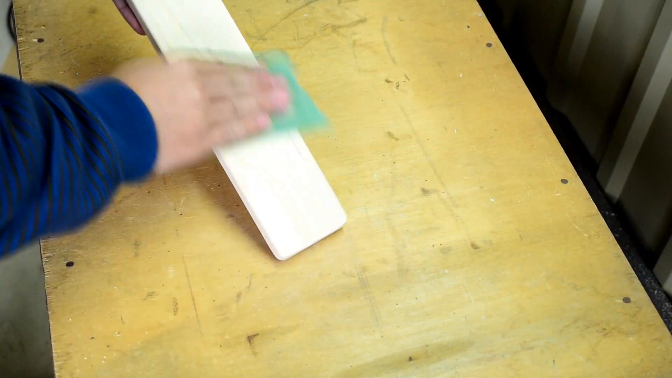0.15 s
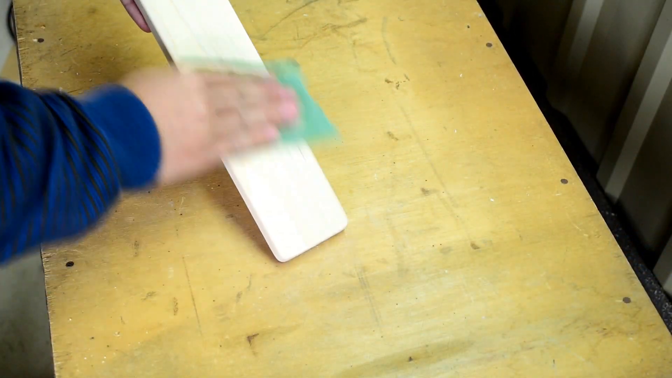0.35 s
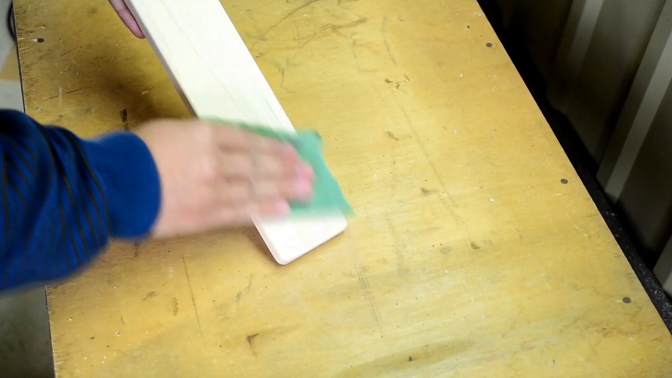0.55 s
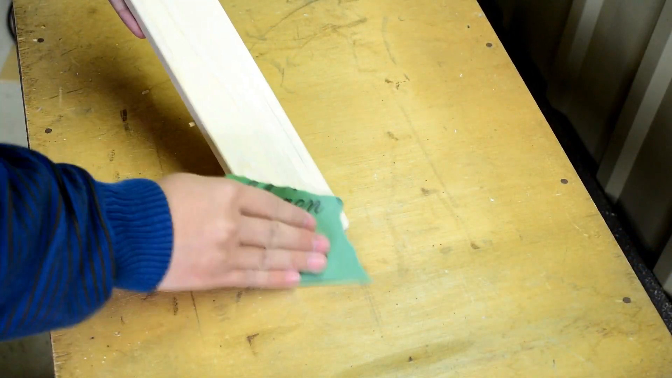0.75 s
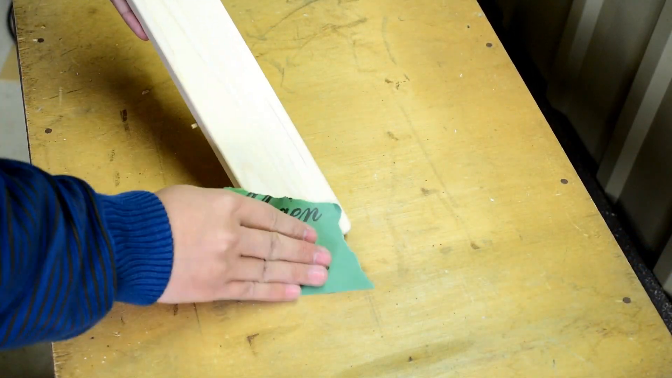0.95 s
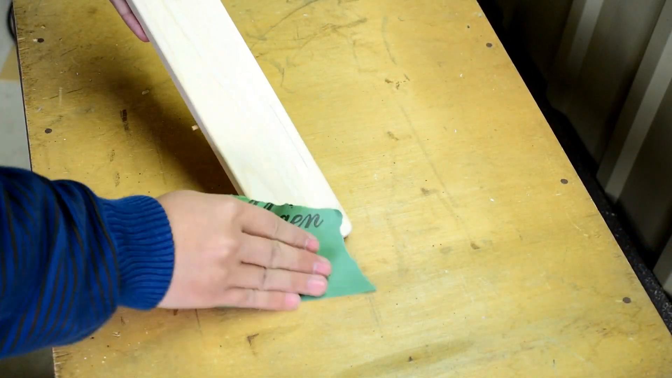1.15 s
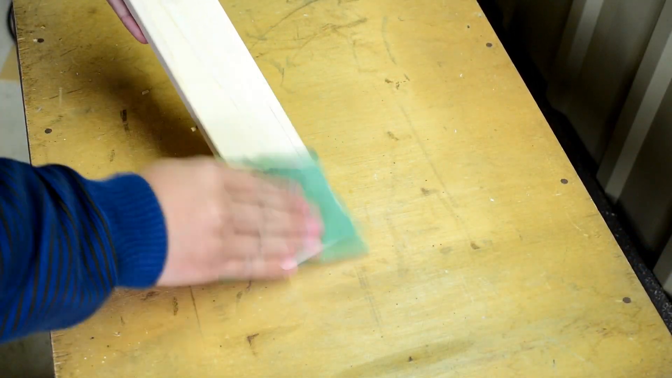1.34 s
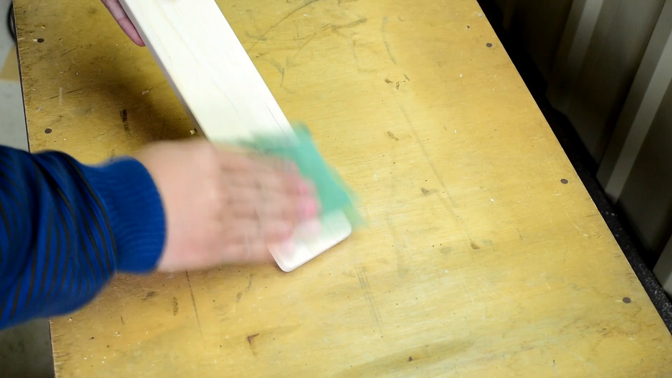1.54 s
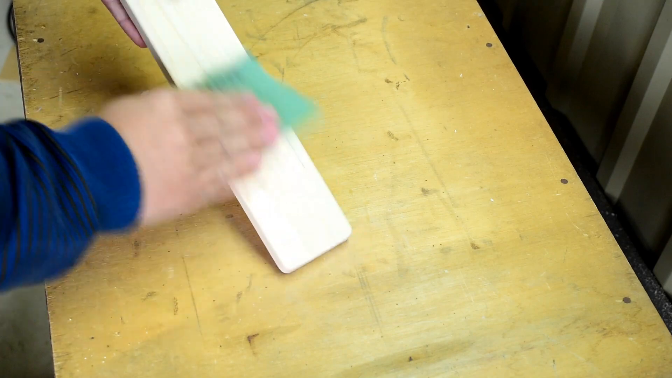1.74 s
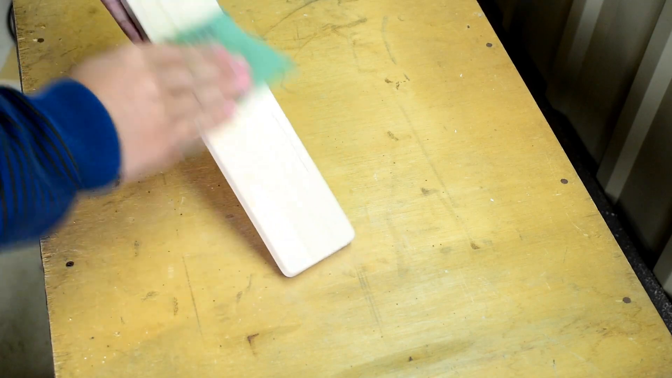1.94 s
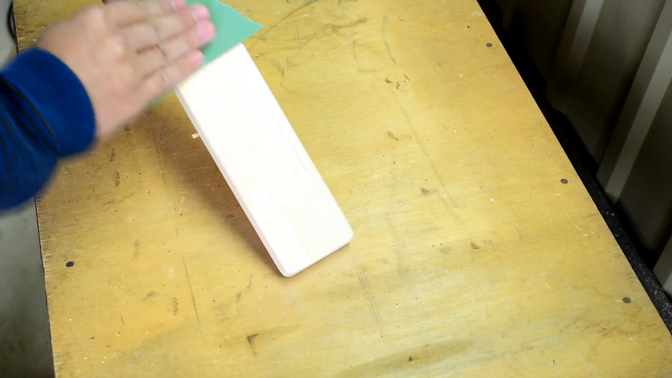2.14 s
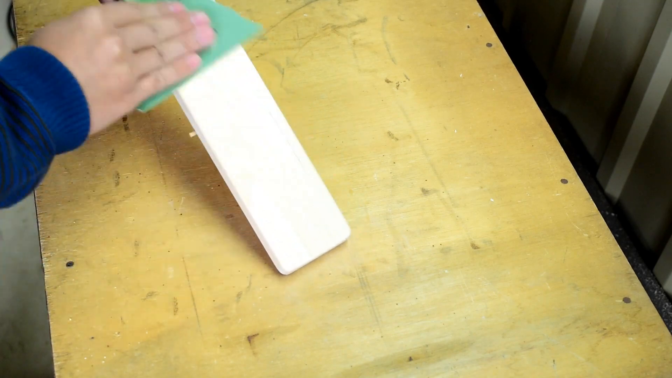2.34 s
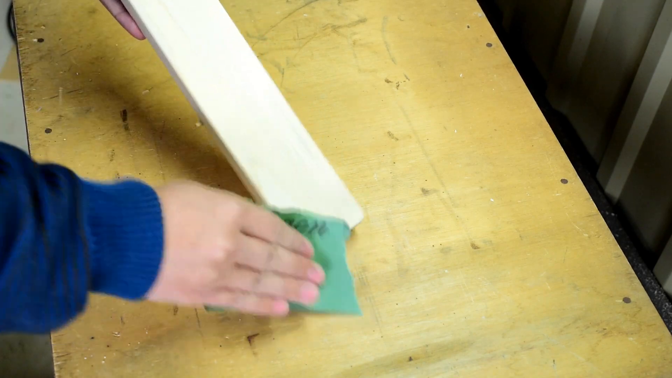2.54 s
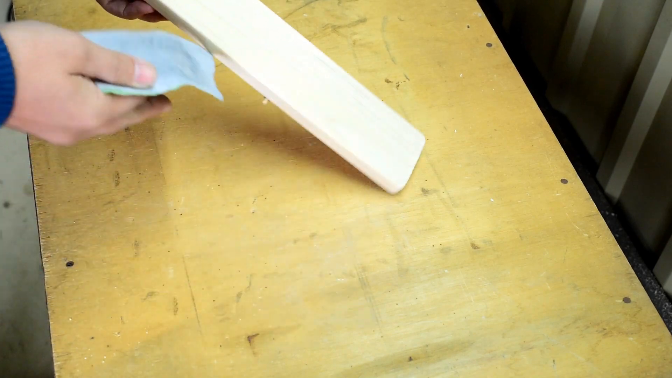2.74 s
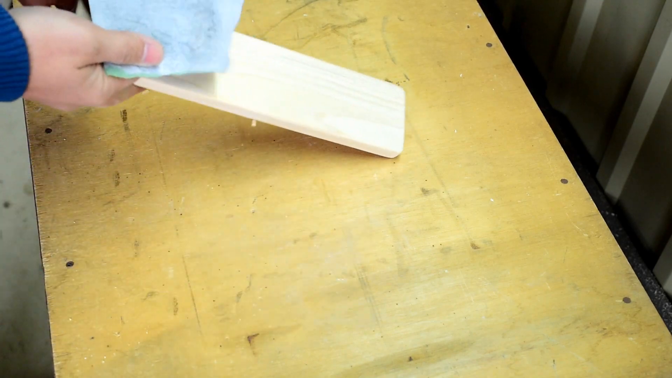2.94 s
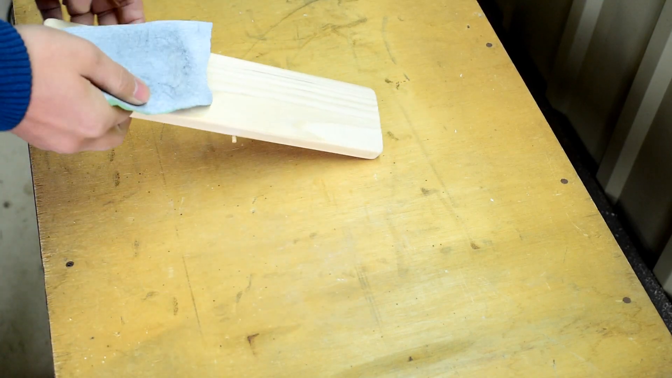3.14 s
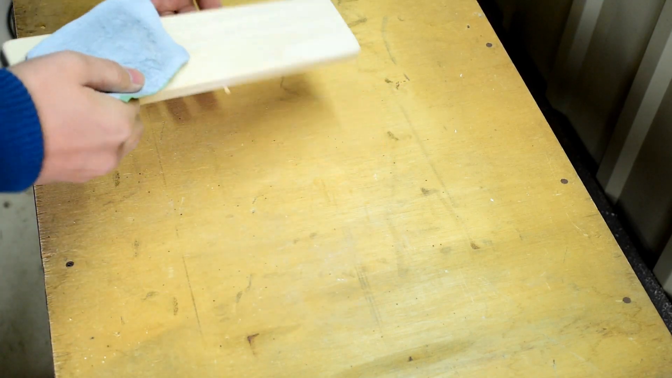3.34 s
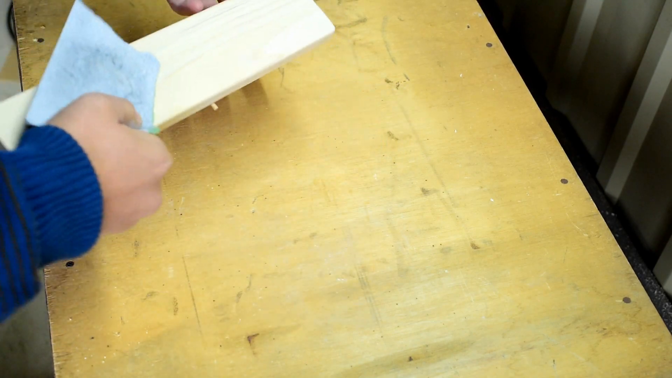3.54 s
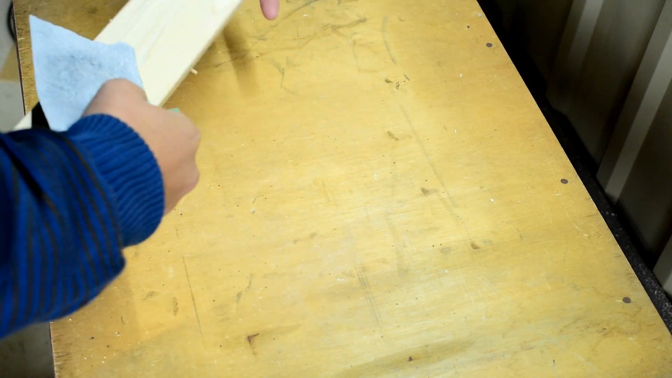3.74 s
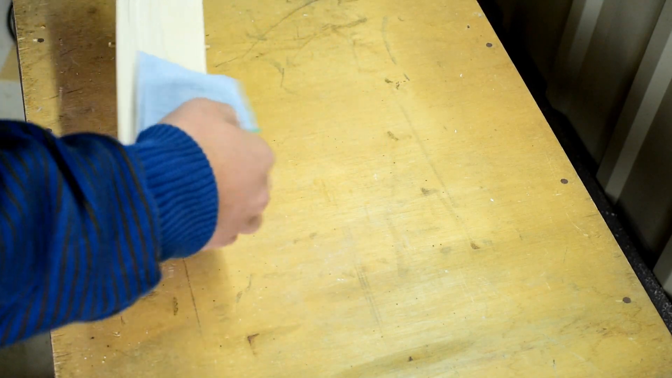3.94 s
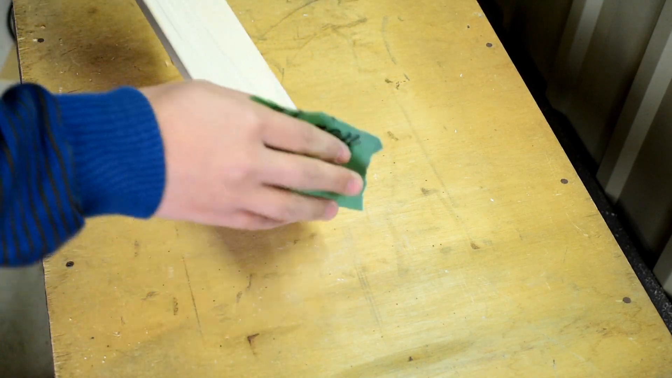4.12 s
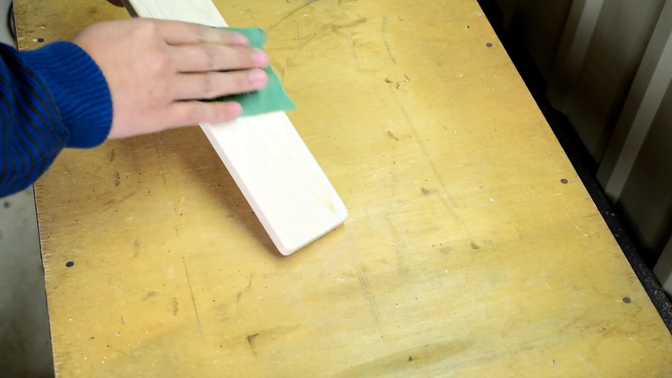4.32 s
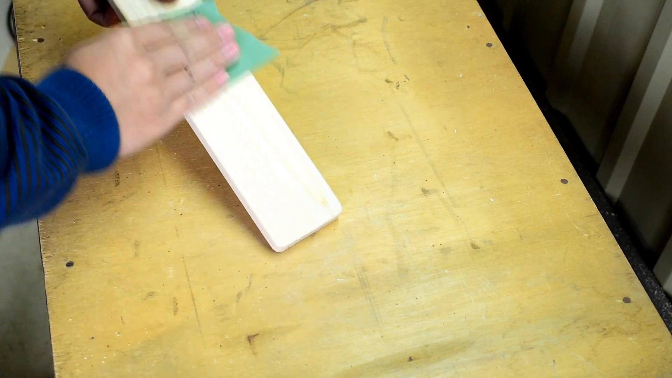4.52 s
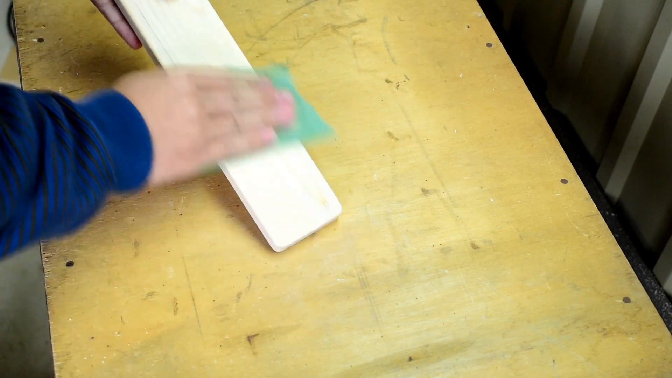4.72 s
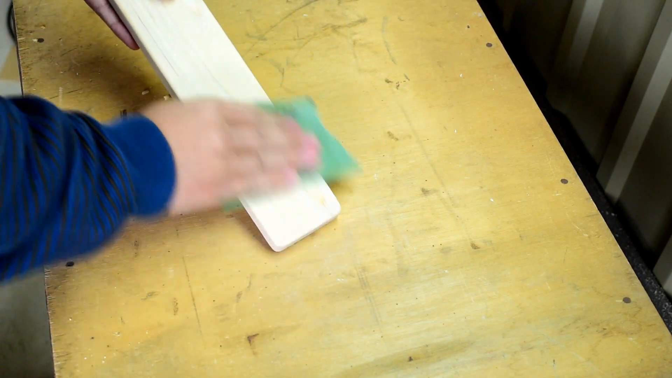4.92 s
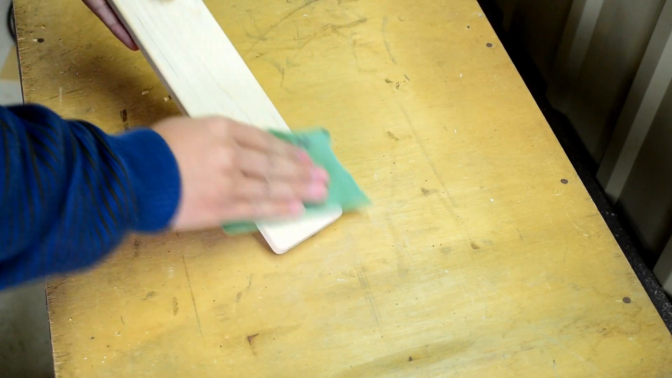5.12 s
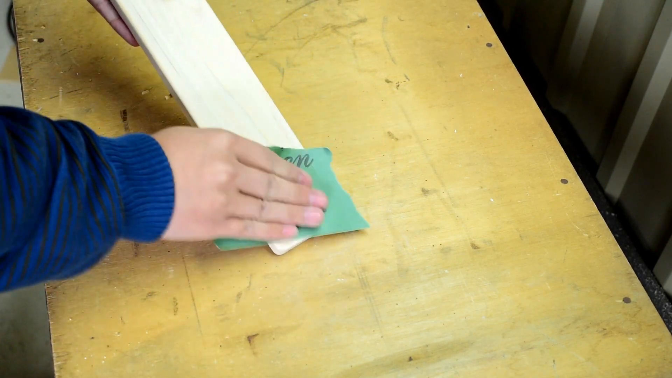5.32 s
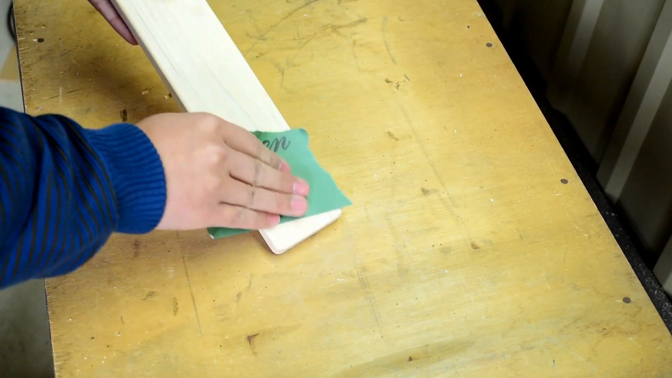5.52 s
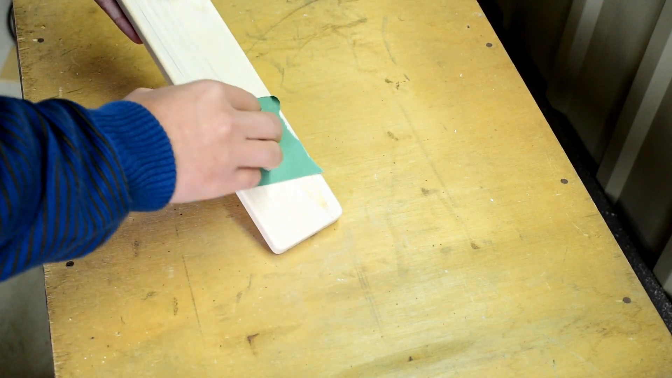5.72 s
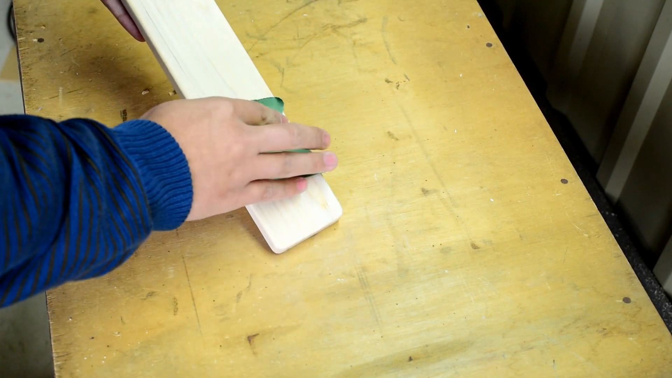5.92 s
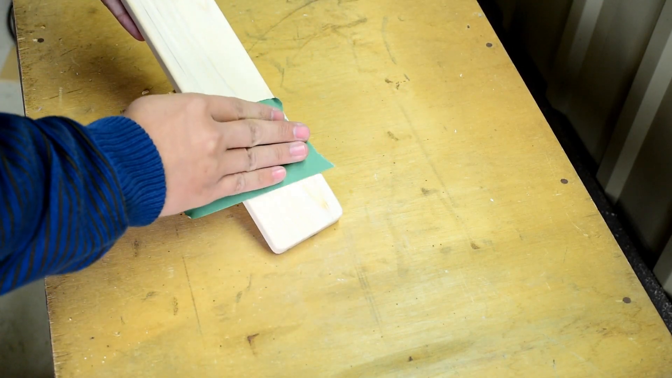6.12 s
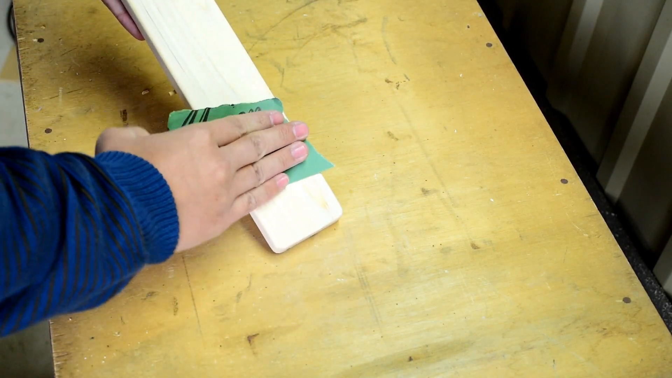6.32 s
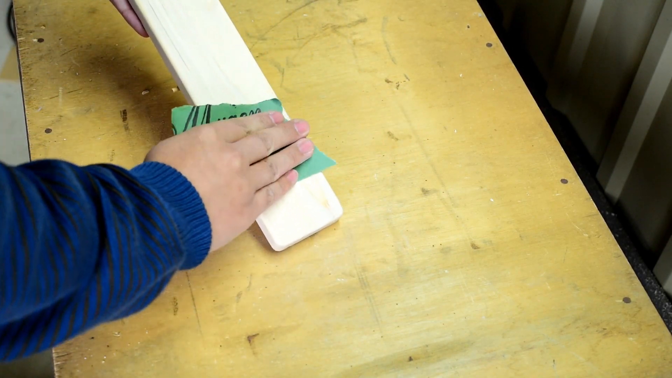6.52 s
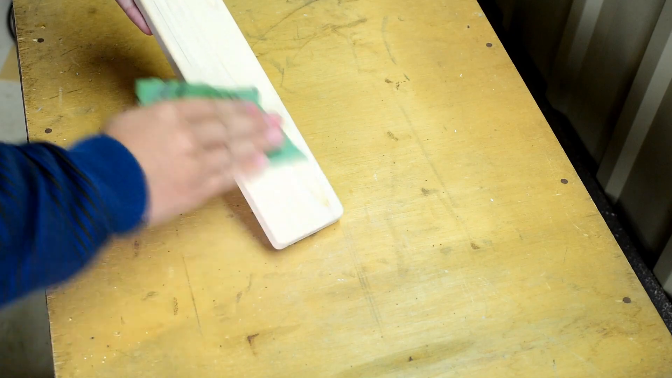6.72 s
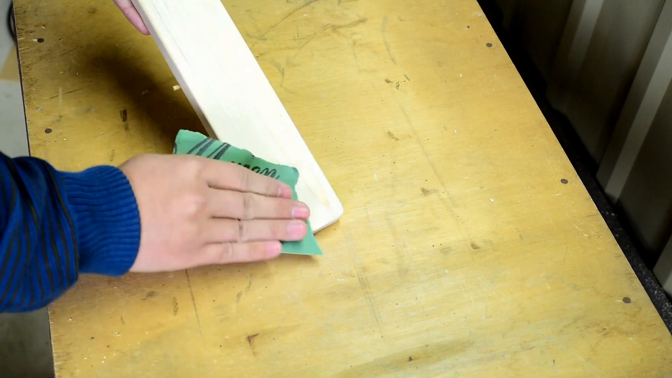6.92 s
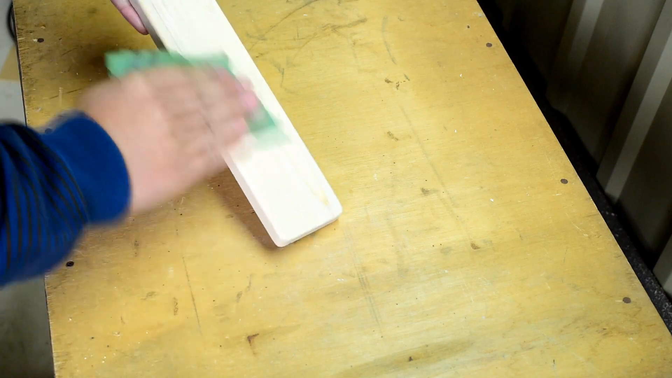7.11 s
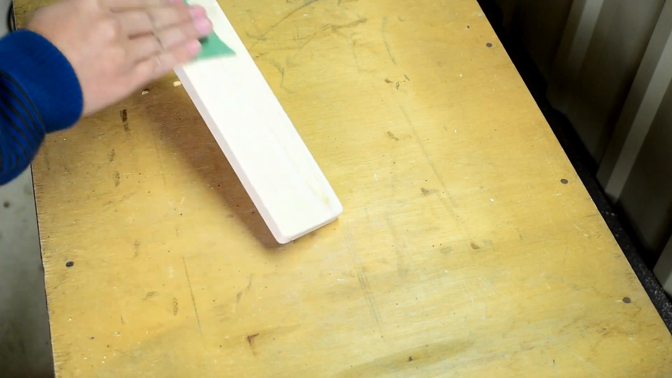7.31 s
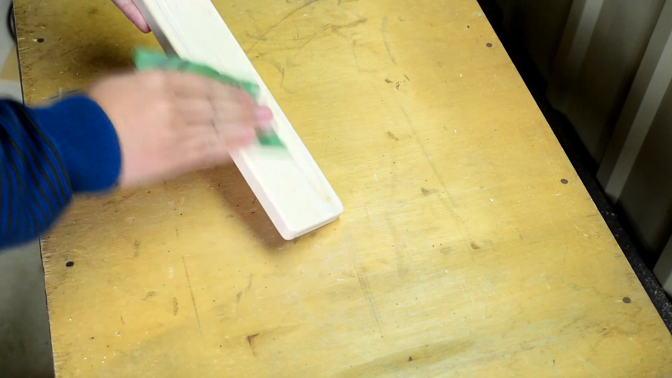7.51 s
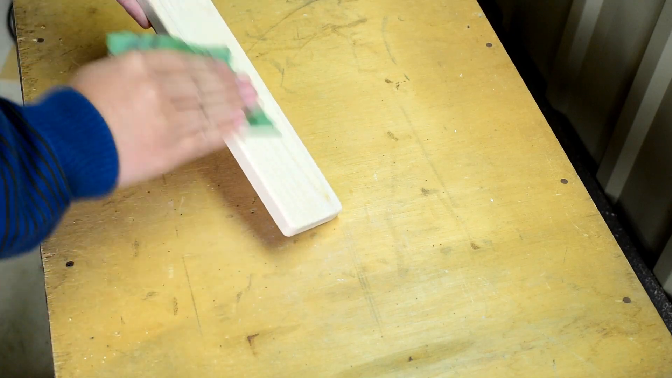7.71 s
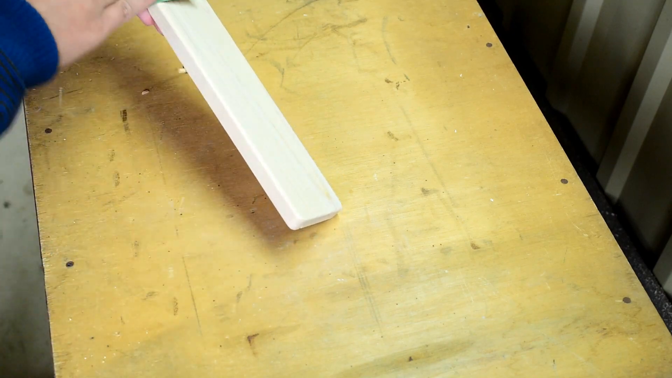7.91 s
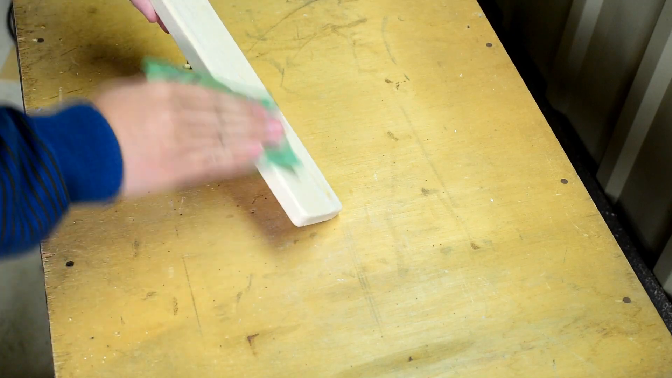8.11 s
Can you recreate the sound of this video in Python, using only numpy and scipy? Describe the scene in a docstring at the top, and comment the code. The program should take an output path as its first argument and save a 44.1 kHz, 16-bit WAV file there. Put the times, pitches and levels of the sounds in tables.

```python
"""A small shop: a hand sands a wooden board on a workbench, to and fro, close to a stereo microphone.
Grit is shaped noise (hiss, rasp, wood murmur) that follows the speed and pressure of the hand.
The board bumps the bench at the turns; turned over in the pauses, it knocks: decaying bench and board modes.
Paper rustles and clicks as it is gripped anew: short shaped noises. Reflections and a quiet floor surround all."""
import sys
import numpy as np
from scipy import signal
from scipy.fft import rfft, irfft
from scipy.io import wavfile
from scipy.ndimage import uniform_filter1d

SR = 44100
rng = np.random.default_rng(int(sys.argv[2]) if len(sys.argv) > 2 else 0)


def output_pcm(signal):
    """Save a mono or channel-first signal as 16-bit PCM at the path in sys.argv[1].

    Samples are clipped to [-1, 1] before scaling.
    """
    pcm = np.clip(np.atleast_2d(signal).T, -1, 1) * 32767
    wavfile.write(sys.argv[1], SR, np.round(pcm).astype(np.int16))


N = 364266
TIME, HZ = np.arange(N) / SR, np.fft.rfftfreq(N, 1 / SR)

# Levels in the tables are relative: the sources trim them further.
# background spectrum: (frequency [Hz], density [dB/Hz])
FLOOR_SPECTRUM = [(20, -15.5), (55, -9), (115, -7.5), (190, -13), (270, -15), (400, -26.5), (1000, -27.5),
                  (5000, -28), (12000, -28), (16000, -32.5)]
# shop reflections: (frequency [Hz], t60 [s], strength [dB])
SHOP_BANDS = [(150, 0.84, -4), (500, .52, 0), (950, 0.54, -2.5), (1710, 0.46, 4), (4000, .36, 3.5),
              (12000, 0.097, 0)]
# likeness of left and right: (frequency [Hz], likeness [0-1])
STEREO_LIKENESS = [(60, 0.98), (150, 0.98), (800, 0.92), (1500, 0.81), (3000, 0.6), (7000, 0.3), (15000, 0)]
# paper, left over right: (frequency [Hz], level difference [dB])
PAPER_LEFT_OVER_RIGHT = [(1000, .6), (2400, 1), (4400, -.1), (8100, -1.2), (11000, -2.9), (15000, -4.6)]

# noise of the sources: (frequency [Hz], density [dB/Hz])
HISS_SPECTRUM = [(1500, -39.5), (3000, -36), (5000, -15.5), (7000, -7), (8600, -1), (11500, 2), (14000, 1),
                 (16000, -5.5)]
RASP_SPECTRUM = [(150, -26.5), (400, -25.5), (650, -19), (900, -15), (1150, -20), (1950, -6.5),
                 (2450, -2.5), (3100, 0), (4300, 2), (6000, 2), (10000, -6.5), (16000, -25)]
SWISH_SPECTRUM = [(2500, -27), (5500, -9), (8500, -1.5), (12500, 0), (16000, -8.5)]
SCUFF_SPECTRUM = [(300, -14.5), (900, -4.5), (1800, -7.5), (2800, -2.5), (4200, -3.5), (5600, -2.5),
                  (8000, -13), (16000, -31.5)]
# wood answering the grit: (frequency [Hz], density [dB/Hz])
MURMUR_SPECTRUM = [(110, -10.5), (170, 8), (230, -3.5), (290, -15), (350, 2.5), (430, -13.5), (525, -1.5),
                   (630, -11.5), (930, -1.5), (1100, -7), (1450, 0), (1750, -8), (4000, -24.5)]
# crowd of weak modes of the bench and the things on it: (frequency [Hz], density [dB/Hz])
CLATTER_SPECTRUM = [(100, -21.5), (170, -0.5), (300, 2.5), (450, -14.5), (750, -10), (920, -6), (1120, -9),
                    (1500, -8), (2200, -12.5), (2700, -6), (4000, -11), (6000, -17), (16000, -24)]

# bench modes: (frequency [Hz], level [dB], t60 [s])
BENCH_MODES = [(163.2, -8, 0.18), (188.2, -6, 0.13), (270.4, -12.5, 0.27), (360, -15, 0.26),
               (380.6, -19, 0.096), (571, -19.5, 0.15), (684, -18, 0.044), (866, -5.5, 0.027),
               (933, -1, 0.033), (1440, -10, 0.032), (1610, -7.5, 0.039), (1590, -11, .06),
               (1890, -5.5, .028), (2015, -7.5, .045), (2761, -8, 0.02), (3359, -15.5, .014),
               (3838, -15, .012)]
# first four bending modes of the board: (frequency [Hz], level [dB], t60 [s])
BOARD_MODES = [(532, 3, 0.18), (1459, 9, .05), (2570, -1, 0.052), (4500, -9.5, .015)]

# paper and fingers slide as the grip changes: (time [s], swish [dB], scuff [dB], half-width at 1/e [s])
GRIP_RUSTLES = [(2.92, -50, -60.5, .043), (3.084, -57.5, -56, .022), (3.137, -63, -62.5, .026),
                (3.288, -64, -63, .019), (3.441, -65.5, -63, .04), (3.943, -62, -65.5, .038),
                (4.105, -57, -65.5, .03), (4.402, -48.5, -56.5, .048), (4.52, -57.5, -59, .028),
                (5.855, -63, -83, .035), (5.97, -58, -54.5, .019), (6.266, -70, -71, .017),
                (6.56, -65, -59.5, .029)]
# faint shifting of the fingers: (start [s], end [s])
FIDGET_SPANS = [(2.57, 2.78), (3.19, 3.22), (3.36, 3.39), (3.8, 4.13), (5.69, 5.8), (5.99, 6.12)]
# paper or fingers catch, scrape or tap on the wood: (time [s], level [dB], centre [Hz], decay [s])
CONTACT_CLICKS = [(1.191, -35.5, 4100, .0034), (1.214, -38.5, 4400, .014), (2.517, -38, 4700, .016),
                  (2.708, -49.5, 895, .0042), (3.06, -50, 7000, .0039), (3.544, -57, 1800, .0075),
                  (3.944, -52, 6000, .01), (4.065, -55, 1490, .0039), (4.487, -40.5, 2180, .0055),
                  (4.487, -46, 9000, .004), (4.654, -48, 1600, .007), (5.95, -54.5, 1200, .0066),
                  (6.07, -39, 1050, .0015), (6.2, -54, 2000, .004), (6.201, -43.5, 10000, .004),
                  (6.528, -55, 700, .005), (6.579, -33, 2700, .006), (6.581, -47.5, 800, .004),
                  (6.595, -57, 2700, .035)]
# board knocked and set down: (time [s], bench [dB], board [dB], low-pass of contact [Hz], place struck [0-1])
BOARD_KNOCKS = [(2.7849, -18.3, -18.5, 3500, 0.18), (2.7872, -25.5, -18, 3800, 0.19),
                (2.7917, -30, -21, 2500, 0.18), (2.8075, -35, -29.5, 2180, 0.2),
                (4.2414, -16.3, -23.2, 640, 0.45), (4.2628, -36, -22.3, 1250, 0.47),
                (4.388, -40, -46.5, 1800, 0.12), (4.396, -36.5, -39, 650, 0.18),
                (4.405, -25, -29, 196, 0.39), (4.453, -45.5, -52, 895, 0.14)]
# harder shoves thump the board against the bench: (time [s], peak level [dB])
BOARD_THUMPS = [(.135, -49.5), (.375, -50.5), (.69, -54), (.8, -55), (.918, -53.5), (1.114, -53),
                (1.327, -53.5), (1.738, -54), (1.954, -51), (5.038, -54), (5.145, -48), (6.584, -56),
                (6.974, -57), (8.14, -53.5)]

# moments the hand turns round, one list per bout of sanding: (time [s], ...)
HAND_TURNS = [
    [-.085, .024, .133, .243, .347, .463, .576, .689, .797, .903, 1.005, 1.111, 1.205, 1.315, 1.408, 1.513,
     1.616, 1.73, 1.832, 1.937, 2.049, 2.165, 2.284, 2.399, 2.575],
    [4.53, 4.698, 4.82, 4.932, 5.041, 5.15, 5.263, 5.371, 5.476, 5.587, 5.705],
    [6.57, 6.706, 6.853, 6.979, 7.103, 7.228, 7.378, 7.512, 7.652, 7.796, 7.944, 8.114, 8.29],
]
# manner of each bout: (first stroke [push +1, pull -1], softness of turns [0-1], push over pull [dB],
#   fade over a stroke [dB], rasp at first [dB], fall of the rasp as the wood gets smoother [dB])
BOUT_MANNERS = [(-1, .42, 1.9, 1.6, -52, 2.2), (1, .58, .2, 2, -49.4, 6.5), (1, .54, -.3, .5, -53.3, 2.8)]
# pressure of the hand, as hiss level: (time [s], level [dB])
HAND_PRESSURE = [(0, -40.9), (.5, -42), (1.15, -39.9), (1.5, -41.2), (1.85, -43.2), (2.2, -42.4),
                 (2.55, -42.2), (4.53, -47), (4.63, -40.5), (4.88, -43), (5, -40.7), (5.15, -41.7),
                 (5.54, -41.6), (5.61, -50), (5.7, -51), (6.57, -52), (6.69, -51), (6.74, -44),
                 (7.17, -41.2), (7.42, -45.7), (7.92, -46.8), (8.06, -41.3), (8.26, -43.5)]
# paper bites harder towards the end of a push: (time [s], far end over near end [dB])
PUSH_LEAN = [(0, 1), (.7, 3), (1.15, 9), (1.45, 3), (2.4, 0), (5.6, 2), (6.7, 6.5), (7.3, 8), (7.9, 5),
             (8.15, 11)]

FLOOR_DB = -69.5
EAR_LAG_S = .00003  # sound reaches the left microphone first
BAND_LIMIT_HZ = 15950
ON_EDGE_S = 6.6  # from here the board is tipped on its edge
USUAL_PRESSURE_DB, RASP_SHARE = -42, .35  # rasp follows only this share of a pressure change
ROCK_PEAK_DB, ROCK_SCATTER_DB, ROCK_DELAY_S = -62, 1.5, .007
OVERRUN_START_S, OVERRUN_END_S = .4, 1.35  # strokes run out over the end of the board: turns click
# push starts with a tap, pull with a snag of the paper: (delay [s], level [dB], centre [Hz], decay [s])
TAP = (.0105, -44, 1120, .004)
SNAG = (.005, -42.5, 4800, .015)


def gain_of(db):
    """Decibels to an amplitude factor."""
    return 10 ** (np.asarray(db) / 20)


def evened(x):
    """Scales to rms 1."""
    return x / np.sqrt(np.mean(x ** 2) + 1e-20)


def read(points, hz):
    """Interpolates a table on a log-frequency axis."""
    f, value = np.transpose(points)
    return np.interp(np.log(hz + 1), np.log(f + 1), value)


def follow(curve, time_s):
    """Interpolates a curve over time."""
    return np.interp(time_s, *np.transpose(curve))


def add(mix, start_s, sound):
    """Adds a sound to the mix in place, cut at the end of the mix."""
    part = mix[..., max(round(start_s * SR), 0):][..., :sound.shape[-1]]
    part += sound[..., :part.shape[-1]]


def panned(x, lean_db):
    """Makes left louder than right by lean_db."""
    return x * gain_of(np.array([[.5], [-.5]]) * lean_db)


def paired(x):
    """Turns two unrelated signals into a microphone pair: alike in the bass, apart in the treble."""
    a, b = rfft(x)
    hz = np.fft.rfftfreq(x.shape[1], 1 / SR)
    same = np.clip(read(STEREO_LIKENESS, hz), 0, 1)
    mid = a * np.sqrt((1 + same) / 2)
    side = b * np.sqrt((1 - same) / 2)
    lag = np.exp(-2j * np.pi * hz * EAR_LAG_S)
    return irfft(np.array([mid + side, (mid - side) * lag]), x.shape[1])


def noise(spectrum, grain_db):
    """Dense spray of tiny impacts of uneven size, coloured by a spectrum; rms 1."""
    unevenness = evened(uniform_filter1d(rng.standard_normal(N), size=14))
    spray = paired(rng.standard_normal((2, N)) * gain_of(grain_db * unevenness))
    return evened(irfft(rfft(spray) * gain_of(read(spectrum, HZ)), N))


def coloured_burst(length, colour):
    """Short stereo noise with the given amplitude spectrum; rms 1."""
    white = paired(rng.standard_normal((2, length)))
    return evened(irfft(rfft(white) * colour, length))


def waver(rate_hz):
    """Slow random drift of rms 1, up to about the given rate."""
    return evened(irfft(rfft(rng.standard_normal(N)) / (1 + (HZ / rate_hz) ** 2), N))


def patchy(x, depth_db):
    """The sheet flexes under the fingers, so its resonances come and go; rms 1."""
    z = signal.stft(x, nperseg=512)[2]
    patches = uniform_filter1d(rng.standard_normal(z.shape[1:]), size=3, axis=0)  # across frequency
    patches = uniform_filter1d(patches, size=18, axis=1)  # across time
    return evened(signal.istft(z * gain_of(depth_db * evened(patches)), nperseg=512)[1][:, :N])


def hollow(x, hz, width_hz):
    """One broad resonance of the wood; rms 1."""
    return evened(signal.lfilter(*signal.iirpeak(hz, hz / width_hz, fs=SR), x))


def ring(modes, spread_hz=2400):
    """Decaying modes of a tapped wooden body; high modes reach the two microphones out of step."""
    t, out = TIME[:SR // 2], 0
    for k, (hz, db, t60_s) in enumerate(modes):
        sign = (-1) ** k
        skew_rad = np.array([[1], [-1]]) * sign * min((hz / spread_hz) ** 4, 1)
        out = out + sign * gain_of(db - 60 * t / t60_s) * np.sin(2 * np.pi * hz * t + skew_rad)
    return out


def strokes():
    """Alternates pushes and pulls between turns: (start [s], end [s], push +1 or pull -1, manner)."""
    for turns, manner in zip(HAND_TURNS, BOUT_MANNERS):
        first, soft, push_db, fade_db, rasp_db, smoothing_db = manner
        for k, (start, end) in enumerate(zip(turns, turns[1:])):
            done = k / (len(turns) - 2)
            way = np.sign(first) * (-1) ** k
            yield start, end, way, (soft, push_db, fade_db, rasp_db - smoothing_db * done)


def background():
    """Steady quiet noise of the shop."""
    return gain_of(FLOOR_DB) * noise(FLOOR_SPECTRUM, grain_db=-1.5)


def shop(x, first_s=0.0052):
    """Dense wall reflections, each band with its own strength and decay."""
    taps = paired(rng.standard_normal((2, SR))) * (TIME[:SR] > first_s)
    hz, t, z = signal.stft(taps, SR, nperseg=256)
    t60_s = read([(f, t60) for f, t60, db in SHOP_BANDS], hz)[:, None]
    strength_db = read([(f, db) for f, t60, db in SHOP_BANDS], hz)[:, None]
    tail = signal.istft(z * gain_of(strength_db - 60 * t / t60_s), SR, nperseg=256)[1]
    return signal.fftconvolve(x, tail / np.linalg.norm(tail[0]), axes=1)[:, :N]


def fidgeting(swish_db=-71, scuff_db=-71.5, uneven_db=2.5):
    """Faint, uneven sliding of fingers on the loose sheet: swish and scuff envelopes."""
    busy = sum(1. * ((TIME > start) & (TIME < end)) for start, end in FIDGET_SPANS)
    busy = uniform_filter1d(busy, size=1500)
    return gain_of([[swish_db], [scuff_db]]) * busy * gain_of(uneven_db * waver(rate_hz=14))


def handling():
    """Loose paper swishes and fingers scuff the wood: noise under sliding envelopes."""
    swish, scuff = fidgeting()
    for time_s, swish_db, scuff_db, half_s in GRIP_RUSTLES:
        slide = np.exp(-np.minimum(((TIME - time_s) / half_s) ** 2, 20))
        swish += gain_of(swish_db) * slide
        scuff += gain_of(scuff_db) * slide
    paper = gain_of(4.5) * swish * noise(SWISH_SPECTRUM, grain_db=3.5)
    rustle = paper + scuff * noise(SCUFF_SPECTRUM, grain_db=3)
    return patchy(rustle, depth_db=2) * np.sqrt(np.mean(rustle ** 2))


def turn_clicks():
    """Taps and snags at the turns during the overrun: (time [s], level [dB], centre [Hz], decay [s])."""
    for start, end, way, manner in strokes():
        if OVERRUN_START_S < start < OVERRUN_END_S:
            delay_s, *click = TAP if way > 0 else SNAG
            yield start + delay_s, *click


def clicks(octaves=0.74, skirt_db=-23, rise_s=.0007, trim_db=2):
    """Short bursts of slipping: noise strongest round its own pitch, with quick rise and decay."""
    out, t = np.zeros((2, N)), TIME[:SR // 5]
    hz = np.fft.rfftfreq(len(t), 1 / SR) + 1
    for time_s, db, centre_hz, decay_s in [*CONTACT_CLICKS, *turn_clicks()]:
        peak = np.exp(-.5 * (np.log2(hz / centre_hz) / octaves) ** 2)
        skirt = gain_of(skirt_db) * hz / (hz + 500)
        envelope = np.exp(-t / decay_s) * (1 - np.exp(-t / rise_s))
        add(out, time_s, gain_of(db + trim_db) * coloured_burst(len(t), peak + skirt) * envelope)
    return out


def push_force(length_s):
    """Contact force of area 1 that swells and lets go."""
    u = TIME[:SR // 20] / length_s * 4 + .5
    return u * np.exp(-u) / np.sum(u * np.exp(-u))


def bumps(push_s=0.0072):
    """Board rocks at each turn and thumps now and then; soft pushes favour the lowest modes."""
    out = np.zeros((2, N))
    body = ring(BENCH_MODES) + 0.45 * ring(BOARD_MODES)
    thud = signal.oaconvolve(body, push_force(push_s)[None], axes=1)
    thud = thud / np.abs(thud).max()
    rocks = [(start + ROCK_DELAY_S, ROCK_PEAK_DB + ROCK_SCATTER_DB * rng.standard_normal())
             for start, *_ in strokes() if start > 0]
    for time_s, peak_db in [*rocks, *BOARD_THUMPS]:
        add(out, time_s - push_s, gain_of(peak_db) * thud)
    return out


def board_struck_at(place):
    """Free bar: each bending mode sounds as strongly as it moves at the place struck."""
    out = 0
    for k, mode in enumerate(BOARD_MODES):
        phase = (k + 1 + .5) * np.pi * place
        motion = .5 * (np.cos(phase) - np.sin(phase) + np.exp(-phase))
        out = out + motion * ring([mode])
    return out


def knocks(clatter_db=-6, clatter_s=0.014, lowest_hz=110):
    """Each blow rings bench and board; a soft contact weakens the high modes."""
    out, t = np.zeros((2, N)), TIME[:SR // 2]
    bench = ring(BENCH_MODES)
    colour = gain_of(read(CLATTER_SPECTRUM, np.fft.rfftfreq(len(t), 1 / SR)))
    for time_s, bench_db, board_db, contact_hz, place in BOARD_KNOCKS:
        clatter = gain_of(clatter_db) * coloured_burst(len(t), colour) * np.exp(-t / clatter_s)
        body = gain_of(bench_db) * (bench + clatter) + gain_of(board_db) * board_struck_at(place)
        contact = signal.butter(1, min(contact_hz, SR / 3), fs=SR)
        add(out, time_s, signal.lfilter(*contact, body))
    # the bench is too small to radiate deep bass
    bass_cut = signal.butter(2, lowest_hz, "high", fs=SR)
    return panned(signal.lfilter(*bass_cut, out), lean_db=0.6)


def hand(creep, rasp_power=.43):
    """Hand speeds up and slows down in every stroke: hiss and rasp envelopes, place on the board [0-1]."""
    hiss, rasp, place = np.zeros((3, N))
    for start, end, way, (soft, push_db, fade_db, rasp_db) in strokes():
        now = (TIME >= start) & (TIME < end)
        t = TIME[now]
        u = (t - start) / (end - start)
        swell_db = way * follow(PUSH_LEAN, t) - fade_db
        speed = creep + (1 - creep) * np.tanh((np.sin(np.pi * u) / soft) ** 2)
        drive = speed * gain_of(swell_db * (u - .5))
        press_db = follow(HAND_PRESSURE, t) + way * push_db / 2
        hiss[now] = gain_of(press_db) * drive
        # slow grit sounds duller: the rasp falls less than the hiss
        rasp_press_db = RASP_SHARE * (press_db - USUAL_PRESSURE_DB)
        rasp[now] = gain_of(rasp_db + rasp_press_db) * drive ** rasp_power
        place[now] = (1 - way * np.cos(np.pi * u)) / 2
    return uniform_filter1d(np.array([hiss, rasp, place]), size=160, axis=1)


def bench_echo(x, place, near_s=.00028, travel_s=.00022):
    """Bench top mirrors the hiss; the delay, and so the colour, sweeps with the hand; rms 1."""
    delay_s = near_s + travel_s * place
    # longer delay on the right
    echo = np.array([np.interp(TIME - delay_s * ear, TIME, side) for side, ear in zip(x, (1, 1.2))])
    return evened(x + .3 * echo)


def sanding():
    """Grit tears wood fibres: a bright hiss, a lower rasp, and a murmur of board and bench."""
    hiss, rasp, place = hand(creep=0.1)
    on_edge = TIME > ON_EDGE_S
    grip = gain_of(0.81 * waver(rate_hz=60))  # the paper bites unevenly
    hiss_noise = patchy(noise(HISS_SPECTRUM, grain_db=0.0), depth_db=1.74)
    bright = bench_echo(hiss_noise, place) * hiss * gain_of(4.5)
    dull = patchy(noise(RASP_SPECTRUM, grain_db=2.5), depth_db=2) * rasp * gain_of(2.5)
    # on its edge the board murmurs less but sounds hollow
    murmur = noise(MURMUR_SPECTRUM, grain_db=2.5) * gain_of(-39.5 - 2.3 * on_edge)
    scrape = noise(SCUFF_SPECTRUM, grain_db=6)
    edge = hollow(scrape, hz=920, width_hz=110) + gain_of(-5) * hollow(scrape, hz=1440, width_hz=50)
    edge_level = on_edge * rasp * gain_of(-19 + 2 * waver(rate_hz=12))
    wood = murmur * np.sqrt(np.abs(rasp)) + edge * edge_level
    return grip * (bright + dull + wood)


def scene():
    """Paper and wood sound into the shop over its quiet background."""
    paper = sanding() + handling() + clicks()
    paper = irfft(panned(rfft(paper), lean_db=read(PAPER_LEFT_OVER_RIGHT, HZ)), N)
    wood = knocks() + bumps()
    room = shop(gain_of(-13.5) * paper + gain_of(-15.5) * wood)
    return paper + wood + room + background()


def record(dry):
    """The recorder's band limit: a linear-phase low-pass."""
    low_pass = signal.firwin(511, BAND_LIMIT_HZ, window=("kaiser", 9), fs=SR)
    return signal.oaconvolve(dry, low_pass[None], "same")


dry = scene()
out = record(dry)
output_pcm(out)
```